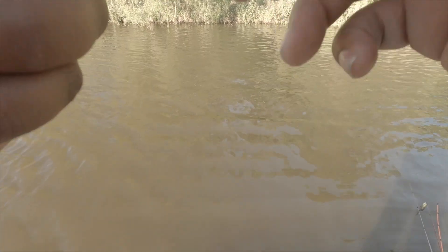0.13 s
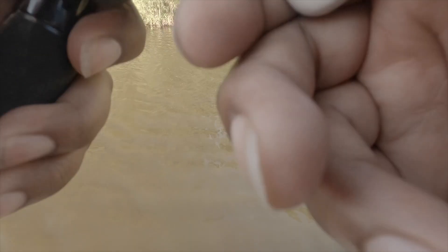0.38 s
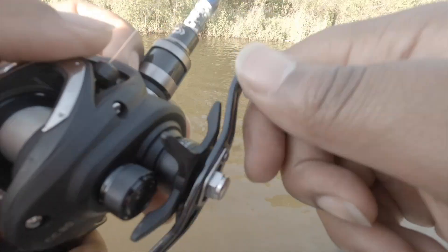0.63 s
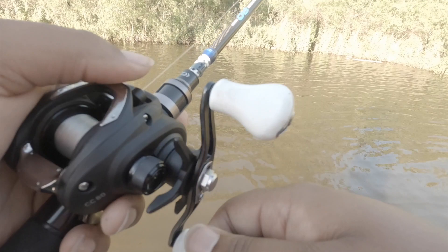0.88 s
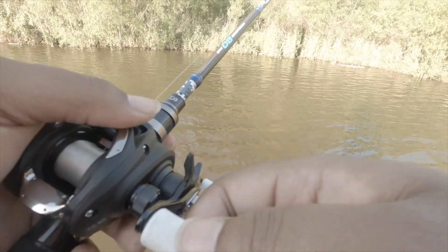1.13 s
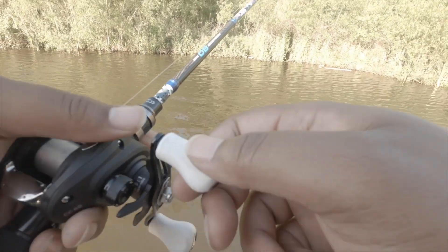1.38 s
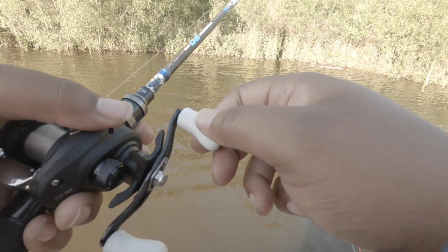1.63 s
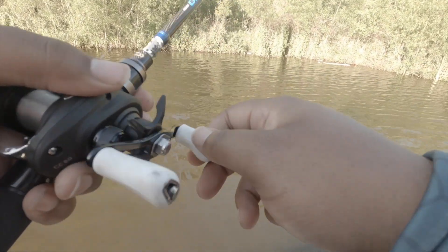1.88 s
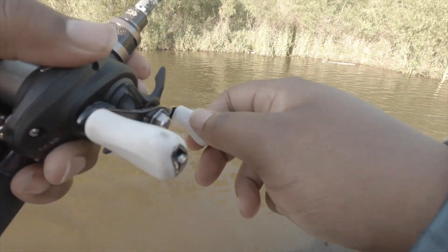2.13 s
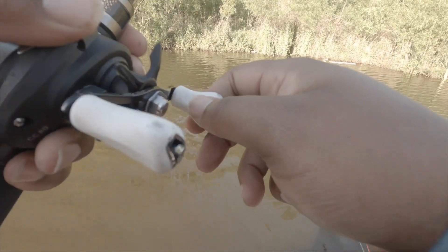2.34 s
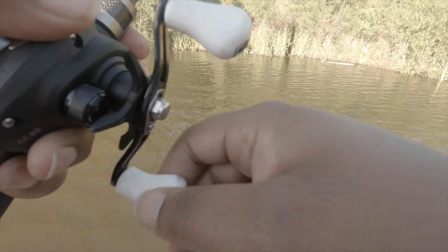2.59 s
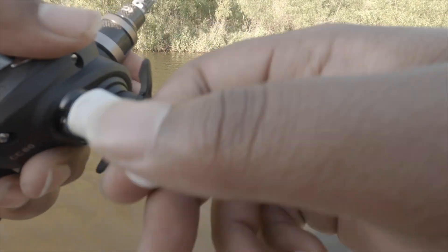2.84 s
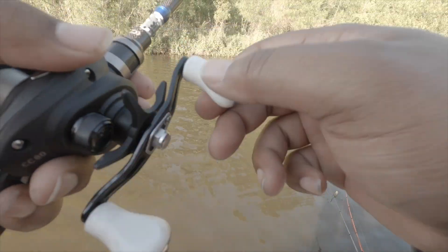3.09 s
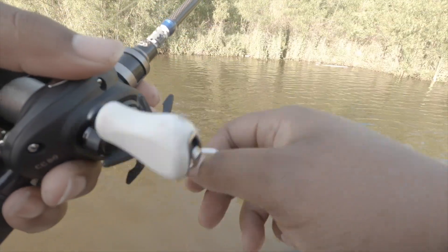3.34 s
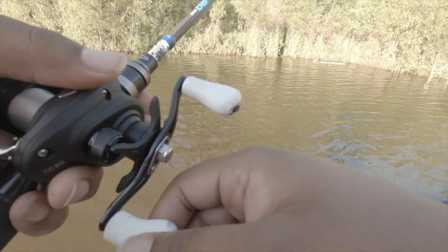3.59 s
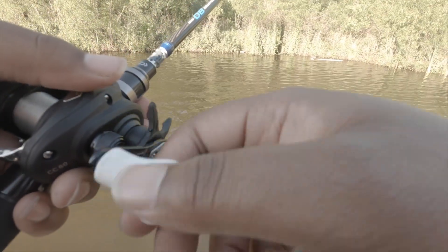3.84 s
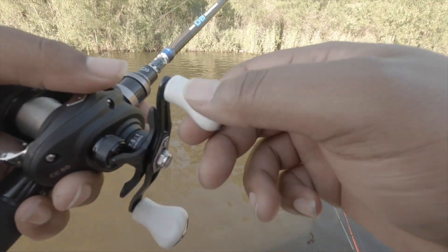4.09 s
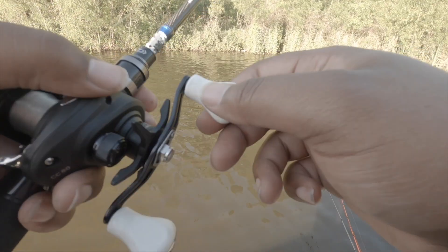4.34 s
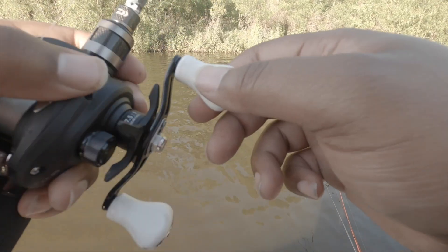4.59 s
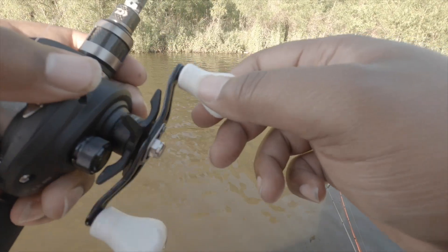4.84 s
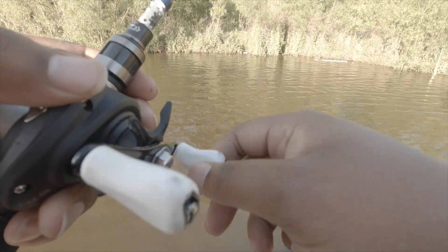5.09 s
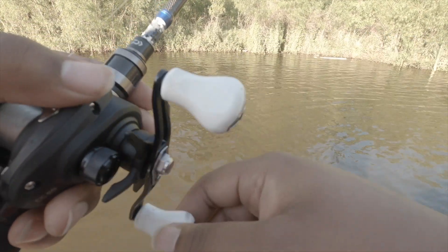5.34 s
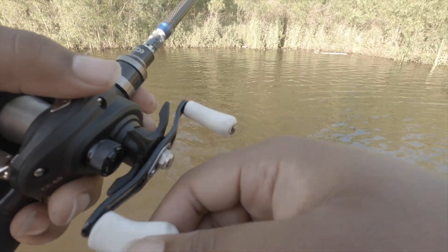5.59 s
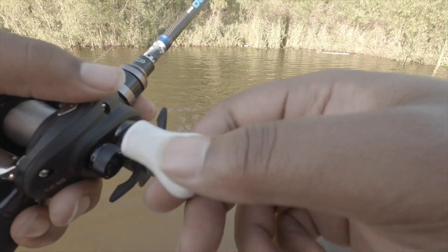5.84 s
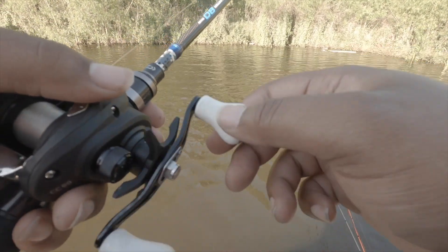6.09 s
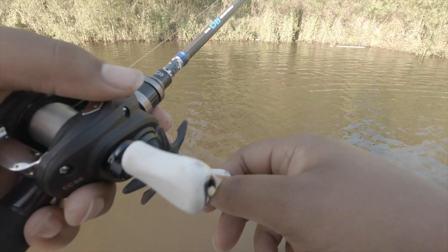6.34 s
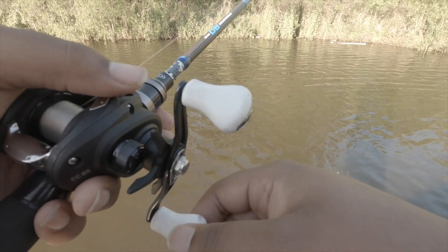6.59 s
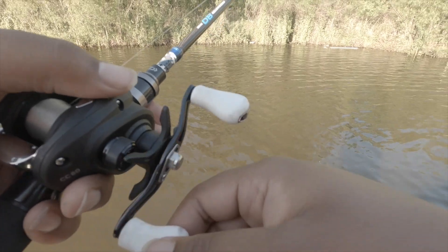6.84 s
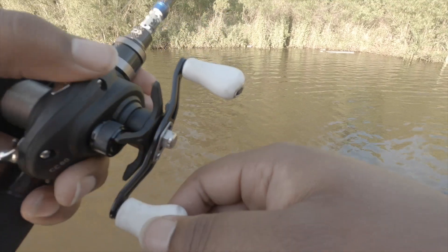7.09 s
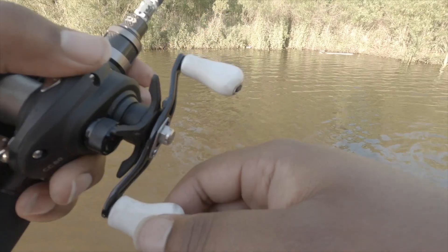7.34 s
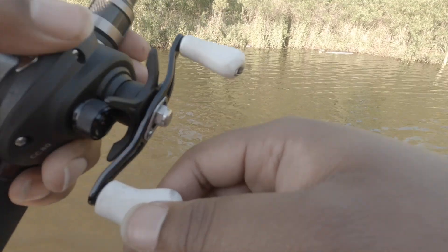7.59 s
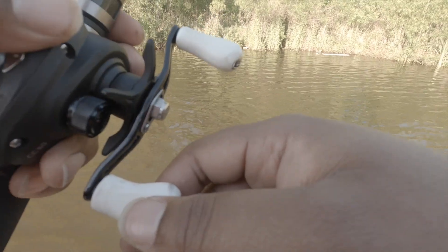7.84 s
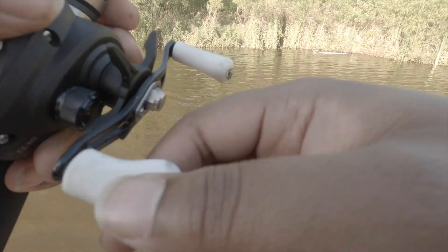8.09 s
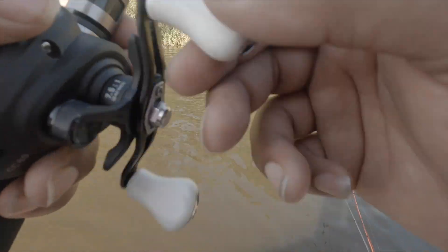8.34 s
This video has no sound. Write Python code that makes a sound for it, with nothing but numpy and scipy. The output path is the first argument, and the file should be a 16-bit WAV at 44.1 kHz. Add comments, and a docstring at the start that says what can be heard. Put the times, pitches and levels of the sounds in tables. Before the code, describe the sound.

A fishing reel snaps sharply and rattles close up, then cranks with a soft whirr as a songbird chirps across a quiet pond.

```python
"""Fishing reel at a pond

A reel is handled and cranked close to the camera: clicks and bumps are shaped noise bursts, the ringing
parts dying sines, gear whirr and the rustle of fingers and line coloured hiss. Across the water birds chirp,
whistle and tweet as fluttering sines, and tree-lined banks answer with echoes. Insects hiss over low wind
rumble and a far drone; fuzzy tones join the cranking, and for a while something scuffs nearby."""
import sys
import numpy as np
from scipy import signal
from scipy.fft import rfft, irfft
from scipy.io import wavfile
from scipy.ndimage import uniform_filter1d

SR = 44100
rng = np.random.default_rng(int(sys.argv[2]) if len(sys.argv) > 2 else 0)


def generate_wav(signal):
    """Clip the signal to [-1, 1] and save it as 16-bit WAV at the path in sys.argv[1]."""
    frames = np.transpose(np.atleast_2d(signal))
    scaled = np.clip(frames, -1, 1) * 32767
    pcm = np.round(scaled).astype(np.int16)
    wavfile.write(sys.argv[1], SR, pcm)


def linear_from_db(decibels):
    """Turn decibels (scalar or array-like) into linear amplitude factors; 0 gives 1."""
    return 10 ** (np.asarray(decibels, float) / 20)


N = 372447  # length in samples


def evened(x):
    """Scaled to rms 1."""
    return x / np.sqrt(np.mean(x ** 2) + 1e-20)


def read(points, hz):
    """A spectrum table read on a log-frequency axis."""
    f, value = np.transpose(points)
    return np.interp(np.log(hz + 1), np.log(f + 1), value)


def add(mix, s, sound):
    """Mixes a sound in at second s, cut off at the end of the mix."""
    part = mix[round(s * SR):][:len(sound)]
    part += sound[:len(part)]


def swells(events):
    """Gain over time of bell-shaped swells (middle s, half length s, dB), added in power."""
    t = np.arange(N) / SR
    return np.sqrt(sum((linear_from_db(db) * np.exp(-((t - s) / half) ** 2)) ** 2 for s, half, db in events))


def hiss(colour_db, size, patchy_db, flicker_db, same, lag=1.3):
    """Stereo noise of rms 1 from random short-time spectra; the left port hears it lag samples late.

    colour_db(hz) gives the colour, same the likeness of the ports (0 to 1)."""
    # how far the left port is louder than the right: f/Hz, level/dB
    port_lean = [(60, 0), (240, 0.5), (950, 3.5), (3770, 3.5), (15000, -1)]
    frames = 4 * N // size + 5
    hz = np.fft.rfftfreq(size, 1 / SR)
    a, b, c, d, patches = rng.standard_normal((frames, len(hz), 5)).T
    patches = uniform_filter1d(patches, size=8, axis=0)  # over frequency
    patches = evened(uniform_filter1d(patches, size=10, axis=1))  # over time
    flicker = evened(uniform_filter1d(rng.standard_normal(frames), size=3))
    same = np.clip(same * np.ones(len(hz)), 0, 1)[:, None]
    left = a + 1j * b
    right = same * left + np.sqrt(1 - same ** 2) * (c + 1j * d)
    earlier = np.exp(2j * np.pi * hz * lag / SR)
    right = right * (earlier / linear_from_db(read(port_lean, hz)))[:, None]
    level_db = colour_db(hz)[:, None] + patchy_db * patches + flicker_db * flicker
    spectra = np.array([left, right]) * linear_from_db(level_db)
    return evened(signal.istft(spectra, nperseg=size, noverlap=3 * size // 4)[1][:, :N])


def fuzzy_tone(hz, width):
    """A tone whose size and phase wander: low-passed complex noise shifted up to hz."""
    a, b = rng.standard_normal((N, 2)).T
    slow = signal.sosfilt(signal.butter(2, width / 2, fs=SR, output="sos"), a + 1j * b)
    return evened((slow * np.exp(2j * np.pi * hz * np.arange(N) / SR)).real)


def note(rows, flutter_db):
    """Start time and near sine along rows of (s, Hz, rms dB); moving air on the way makes it flutter."""
    s, hz, db = np.transpose(rows)
    t = np.arange(s[0], s[-1], 1 / SR)
    a, b = rng.standard_normal((len(t), 2)).T
    waver = 1 + 0.0021 * evened(uniform_filter1d(a, size=200))
    flutter = flutter_db * evened(uniform_filter1d(uniform_filter1d(b, size=300), size=300))
    tone = np.sin(2 * np.pi * np.cumsum(np.interp(t, s, hz) * waver) / SR)
    gain = np.sqrt(2) * linear_from_db(np.interp(t, s, db) + flutter)
    return s[0], gain * tone * signal.windows.tukey(len(t), .2)


def ringing(modes, direct):
    """Frequency response of a body: a direct share plus its resonant modes (Hz, width Hz, dB)."""
    return lambda hz: direct + sum(linear_from_db(db) / (1 + 2j * (hz - f) / w) for f, w, db in modes)


def causal_colour(edges_hz, low_db, treble_db, hz):
    """Minimum-phase response from the energy in three bands, so nothing sounds ahead of the contact."""
    per_hz = np.array([low_db, 0, treble_db]) - 10 * np.log10(np.diff(edges_hz))
    centres = np.sqrt(np.multiply(edges_hz[1:], edges_hz[:-1]))
    top, top_db = edges_hz[-1], per_hz[2]
    colour = [(edges_hz[0] / 3, per_hz[0] - 20), *zip(centres, per_hz),
              (top, top_db - 12), (top * 2.4, top_db - 40), (SR / 2, top_db - 90)]
    log_gain = np.log(linear_from_db(read(colour, hz)))
    phase = -signal.hilbert(np.r_[log_gain, log_gain[-2:0:-1]]).imag[:len(hz)]
    return np.exp(log_gain + 1j * phase)


def bursts(events, edges_hz, rise_s, grain_db, tap, body):
    """Dying bursts of grainy noise, coloured by their low and treble shares and by the body they excite."""
    out = np.zeros(N)
    t = np.arange(16384) / SR
    hz = np.fft.rfftfreq(len(t), 1 / SR)
    end_fade = np.clip((t[-1] - t) * 20 - 1, 0, 1)
    for s, peak_db, low_db, treble_db, t60 in events:
        noise = rng.standard_normal(len(t))
        unevenness = evened(uniform_filter1d(rng.standard_normal(len(t)), size=40))
        burst = noise * linear_from_db(grain_db * unevenness) * np.minimum(t / rise_s, 1) * linear_from_db(-60 * t / t60)
        burst[0] += tap  # the first contact is one firm tap
        response = causal_colour(edges_hz, low_db, treble_db, hz) * body(hz)
        sound = irfft(rfft(burst) * response) * end_fade
        add(out, s, linear_from_db(peak_db) * sound / abs(sound).max())
    return out


def ports(x, lean_db, lag):
    """A source reaches the left microphone port lag samples late and lean_db louder than the right."""
    late = np.interp(np.arange(N) - lag, np.arange(N), x)
    return np.array([late * linear_from_db(lean_db / 2), x * linear_from_db(-lean_db / 2)])


def wind():
    """Gain of the rumble: slow chance around its usual level, plus stronger puffs added in power."""
    # stronger puffs: middle t/s, half length/s, level/dB
    puffs = [(0, 0.092, -37.5), (.33, 0.064, -35), (5.27, 0.0695, -30.5), (6.42, 0.082, -36),
             (7.43, 0.113, -34), (7.88, 0.078, -36), (8.28, 0.039, -40.5)]
    usual_db, wander_db, fastest_hz = -39, 1.2, 5
    t = np.arange(0, N, 64) / SR
    chance = evened(sum(np.sin(2 * np.pi * (fastest_hz * k * t + rng.random())) / np.sqrt(k)
                        for k in np.geomspace(1 / 8, 1, num=24)))
    wander = wander_db * np.interp(np.arange(N) / SR, t, chance)
    return np.hypot(linear_from_db(usual_db + wander), swells(puffs))


def pond_air():
    """A steady wash of noise whose part below about 160 Hz is a rumble that follows the wind."""
    # colour of the quiet pond: f/Hz, relative density level/dB per Hz
    air_colour = [(12, -32.5), (20, -1.5), (91, -2.5), (130, -10.5), (222, -21), (357, -33.5), (446, -33),
                  (780, -43.5), (2910, -70), (4180, -43.5), (5680, -70), (7110, -70), (16000, -99)]
    # likeness of the two microphone ports: f/Hz, likeness (0 to 1)
    port_likeness = [(25, .55), (60, 0.84), (130, 0.96), (290, 0.9), (640, 0.78), (1410, 0.45),
                     (3100, 0.23), (6820, 0.16), (15000, 0.27)]
    same = read(port_likeness, np.fft.rfftfreq(2048, 1 / SR))
    air = linear_from_db(-33.5) * hiss(lambda f: read(air_colour, f), size=2048, patchy_db=0.8667,
                            flicker_db=1.0345, same=same)
    rumble = signal.sosfiltfilt(signal.butter(2, 160, fs=SR, output="sos"), air)
    return air - rumble + wind() * evened(rumble)


def insects():
    """Distant choruses: noise in bell-shaped bands."""
    # centre f/Hz, width/Hz, rms level/dB
    choruses = [(4070, 650, -63.5), (7040, 740, -81.5)]
    out = np.zeros((2, N))
    for centre_hz, width, db in choruses:
        out += linear_from_db(db) * hiss(lambda f: -6 * (2 * (f - centre_hz) / width) ** 2, size=512,
                              patchy_db=1.5, flicker_db=0.33, same=.35)
    return out


def far_drone():
    """A far, steady hum of a few narrow wandering tones."""
    # f/Hz, width/Hz, rms level/dB
    hum = [(79.64, 9, -45), (164.47, 6.9, -56.5), (242.16, 14, -59)]
    return sum(linear_from_db(db) * fuzzy_tone(hz, width) for hz, width, db in hum)


def gear_whirr():
    """Meshing gears, heard as coloured noise whose level follows the crank."""
    # whirr over time: t/s, rms level/dB
    crank_level = [(0, -53.5), (.52, -49.5), (.89, -53.5), (1.25, -54), (1.76, -55.5), (2.02, -61),
                   (2.4, -61.5), (2.59, -57.5), (3.1, -60.5), (4.8, -58.5), (5.06, -55), (5.65, -57),
                   (5.81, -54.5), (6.63, -53.5), (6.9, -58.5), (7.62, -64.5), (8.09, -60.5), (8.45, -54.5)]
    # whirr colour: f/Hz, relative density level/dB per Hz
    gear_colour = [(180, -34), (300, 0), (469, -9.5), (1320, -10), (2340, -24.5), (3950, -19), (4900, -26),
                   (8540, -37), (12000, -82.5), (15600, -90), (22000, -120)]
    s, db = np.transpose(crank_level)
    whirr = hiss(lambda f: read(gear_colour, f), size=512, patchy_db=3.0, flicker_db=1.0, same=.6)
    return linear_from_db(np.interp(np.arange(N) / SR, s, db)) * whirr


def chirps():
    """A songbird across the water: a held note that slides down, then a short rising curl."""
    # one chirp: t/s after its start, f/Hz, relative level/dB
    chirp_shape = [(0, 2850, -20), (.014, 2795, -8), (.038, 2705, -1), (.08, 2680, 1), (.096, 2600, 0),
                   (.122, 2310, -6), (.138, 2190, -6), (.152, 2160, -7), (.166, 2210, -12)]
    # each chirp: t/s, level/dB added to the shape, lead-in left out/s
    chirp_times = [(.0, -66.5, 0.017), (1.482, -60, 0.022), (1.764, -62, 0.0009), (2.047, -57, 0.00091),
                   (3.371, -57, 0.0232), (3.659, -57, 0.00101), (3.939, -55, 0.00078), (6.269, -62, 0.022),
                   (6.545, -58, 0.000936), (6.831, -58, .001)]
    curl_late_s, curl_s, curl_db = .175, .04, -9
    out = np.zeros(N)
    for s, db, skip in chirp_times:
        start, sound = note(np.array(chirp_shape) + [s, 0, db], flutter_db=3)
        add(out, start, sound * np.clip((np.arange(len(sound)) / SR - skip) / 0.014, 0, 1))
        s += curl_late_s
        curl = [(s, 2260, db + curl_db), (s + curl_s, 2480, db + curl_db)]
        add(out, *note(curl, flutter_db=4))
    return out


def banks(x, t60, wet_db):
    """Tree-lined banks return smeared echoes and a tail of scattered single reflections from the trunks."""
    # late/s, spread/s, level/dB of each smeared echo
    bank_echoes = [(.125, 0.009, -11), (.21, .04, -15), (.31, .05, -19)]
    t = np.arange(SR) / SR
    per_s = 1800  # reflections
    taps = rng.standard_normal((2, SR)) * (rng.random((2, SR)) < per_s / SR)
    shapes = [(wet_db, linear_from_db(-60 * t / t60) * np.minimum(t / 0.088, 1) ** 2)]
    shapes += [(db, np.exp(-((t - late) / spread) ** 2)) for late, spread, db in bank_echoes]
    wet = sum(linear_from_db(db) * shape / np.sqrt(per_s / SR * np.sum(shape ** 2)) for db, shape in shapes)
    band = signal.butter(2, [2500, 4200], "bandpass", fs=SR, output="sos")
    dull = signal.sosfilt(band, x)  # leaves return a limited band
    return signal.fftconvolve(dull[None], taps * wet, axes=1)[:, :N]


def clicks():
    """The reel close by: snaps and clicks are noise bursts that ring its frame."""
    # t/s, peak level/dB ahead of the ports, low and treble shares/dB over the middle ahead of
    # the ringing, decay t60/s of the burst
    click_events = [(.058, -40.5, 10, -19.5, 0.125), (.0917, -43, -3, -34, 0.015),
                    (.195, -40, 19, -29.5, 0.037), (.2189, -37.5, -1, -12, 0.0075),
                    (.2927, -32.5, 4.5, 6, 0.0042), (.3044, -35.5, 8, -8, 0.0092),
                    (.3381, -26.5, 1.5, -7, 0.018), (.3742, -23.5, -5, -9.5, 0.0224),
                    (.3786, -8.5, -23.5, -7.5, 0.019), (.3821, -1.5, -6, 6.5, 0.0073),
                    (.3843, -13, -6, 5, 0.0074), (.4274, -20.5, -5.5, -9, 0.0096),
                    (.4594, -35, -16.5, -26, .012), (.4783, -28.5, -22, -5, 0.03),
                    (.4924, -33, -13.5, -3.5, 0.05), (.5821, -32, 16, 3, 0.013),
                    (.6144, -29, 4, -7.5, 0.01), (.6784, -31.5, 12, -10, 0.0084),
                    (.7135, -27.5, -27, 7.5, 0.025), (.8245, -32, 3, -6, 0.0109),
                    (.9765, -32.5, -9.5, -19.5, 0.022), (1.0849, -36.5, -2, -12.5, .0098),
                    (1.2494, -46, 1.5, 6, .008), (1.6536, -41.5, -4, -18.5, .01),
                    (3.6594, -49.5, -2.5, -10, .008), (4.205, -54, -6.5, -8.5, 0.0076),
                    (4.3026, -48.5, -14, 4.5, 0.0076), (5.0953, -37.5, 5, -9, 0.0214),
                    (6.2024, -46, 1.5, -6.5, 0.0073), (6.2387, -38.5, 0.5, -1, 0.0123),
                    (6.4134, -41, 11.5, -4, 0.0096), (6.5444, -41, 20, -12, 0.0056),
                    (6.5844, -48.5, 3.5, 7.5, .0049), (6.8369, -39.5, -5.5, -16.5, 0.0059),
                    (8.3894, -42.5, -10.5, -4.5, 0.0093)]
    # what the frame rings with: f/Hz, width/Hz, level/dB
    frame_modes = [(1630, 200, -11.5), (2657, 169.57, -3), (4440, 200, -6), (5040, 500, -2.5),
                   (7100, 900, 0.5), (8480, 600, -10.5), (9880, 500, -17.5), (12500, 1500, -9)]
    return bursts(click_events, [300, 1500, 5000, 14000], rise_s=0.00011, grain_db=5.5, tap=4.5,
                  body=ringing(frame_modes, .3))


def bumps():
    """Knocks through the camera mount: low, soft-edged bursts without a ringing body."""
    # t/s, peak level/dB ahead of the ports, low and upper shares/dB over the middle, decay t60/s
    bump_events = [(.059, -35.5, 2.5, 7, 0.094), (.193, -31.5, 10, 6, 0.174), (.38, -30.5, 3, 6, 0.067),
                   (.428, -28, 12.5, 11.5, 0.133), (1.007, -28.5, -5, -7.5, 0.112),
                   (1.379, -32, 14, -2, 0.117), (5.189, -26, 6, -8.5, .13), (5.228, -23, 19.5, 3.5, .25),
                   (5.339, -27, 0, -7, 0.22), (5.472, -26.5, 16, 11.5, 0.401),
                   (6.391, -21.5, -21, -5.5, 0.25), (6.446, -23.5, 4.5, -8, 0.128)]
    return bursts(bump_events, [30, 100, 220, 450], rise_s=0.0055, grain_db=-0.11, tap=4.492,
                  body=np.ones_like)


def rustle():
    """Fingers and line slide over the spool: grains of patchy noise swell with each stroke."""
    # middle t/s, half length/s, level/dB
    strokes = [(.06, 0.021, -66), (.35, 0.056, -67), (.49, 0.0186, -42.5), (.54, 0.057, -53),
               (.61, 0.0486, -44.5), (.68, 0.052, -62), (.716, 0.0088, -38.5), (.76, 0.0405, -53.5),
               (.875, 0.0313, -58), (.97, 0.076, -63), (1.12, .06, -57.5), (1.35, 0.126, -75)]
    # colour of skin and line: f/Hz, relative density level/dB per Hz
    skin_colour = [(400, -29.5), (1000, -8), (2500, -6), (4600, -0.5), (7200, -4.5), (9000, -14),
                   (12500, -24), (15500, -23.5), (16500, -59)]
    grains = hiss(lambda f: read(skin_colour, f), size=256, patchy_db=2.5, flicker_db=1.0,
                  same=0.85, lag=0.89)
    return swells(strokes) * grains


def pings():
    """Short pitched pings, as of loose parts let go: dying sines that start softly."""
    # t/s, level/dB ahead of rise and decay, f/Hz, decay t60/s
    ping_events = [(0.3798, -20, 2666, 0.0233), (0.427, -22.5, 2712, 0.0135), (0.4277, -29.5, 4367, 0.011),
                   (0.478, -20.5, 2722, 0.0161), (0.4778, -22.5, 4405, 0.0163), (.487, -34.5, 4240, 0.031),
                   (0.4926, -28, 4454, 0.025), (.493, -33, 1656, 0.02), (.5, -33.5, 2733, 0.045),
                   (.535, -46, 2775, .06), (0.8246, -30.5, 3187, 0.0111), (.827, -34, 1717, 0.0183),
                   (5.0606, -31, 1566, 0.0285), (5.062, -39.5, 1887, 0.0254), (5.062, -43, 1018, 0.115),
                   (5.0955, -41.5, 2314, 0.0277)]
    rise_s = .0012
    out = np.zeros(N)
    t = np.arange(8192) / SR
    for s, db, hz, t60 in ping_events:
        envelope = linear_from_db(db - 60 * t / t60) * (1 - np.exp(-t / rise_s))
        add(out, s, envelope * np.sin(2 * np.pi * hz * t))
    return out


def tweets():
    """Short slurred notes of other birds, each gliding from one pitch to another."""
    # t/s, length/s, start f/Hz, end f/Hz, level/dB
    slurs = [(0.986, 0.091, 2832, 3120, -67.5), (1.672, .016, 4880, 5635, -74),
             (1.782, .018, 5750, 5030, -76), (1.81, .02, 6400, 5890, -74.5),
             (3.03, 0.071, 6000, 4910, -81.5), (3.739, .075, 2852, 3331, -68.5),
             (5.021, 0.0256, 3000, 3290, -70), (5.167, 0.0233, 2995, 3350, -71.5),
             (5.315, 0.0257, 3000, 3412, -69.5), (5.603, .025, 2992, 3327, -73.5),
             (6.738, .024, 6050, 6600, -74.5), (6.754, .028, 6590, 5560, -74.5),
             (6.778, 0.0134, 5510, 5580, -77.5), (6.799, 0.029, 5800, 5420, -77),
             (6.992, 0.0142, 6700, 5950, -77.5), (7.008, 0.055, 5915, 5980, -76.5)]
    out = np.zeros(N)
    for s, length, start_hz, end_hz, db in slurs:
        add(out, *note([(s, start_hz, db), (s + length, end_hz, db)], flutter_db=4.5))
    return out


def whines():
    """Fuzzy tones while cranking, faded in and out."""
    # from t/s, to t/s, f/Hz, width/Hz, level/dB ahead of the fades
    whine_spans = [(1.388, 1.751, 1332, 61, -62), (5.95, 6.998, 622.5, 23.88, -62)]
    out = np.zeros(N)
    for s, end, hz, width, db in whine_spans:
        count = round((end - s) * SR)
        add(out, s, linear_from_db(db) * fuzzy_tone(hz, width)[-count:] * signal.windows.tukey(count, .5))
    return out


def whistles():
    """The farther bird's held notes: each swells, then fades away, its pitch drooping a little."""
    # t/s, length/s, f/Hz and level/dB at the height of the swell, share of the length spent swelling
    held_notes = [(1.779, 0.37, 5860, -70.5, 0.297), (1.941, 0.31, 4549, -62, .45),
                  (2.2, 0.54, 6905, -76, 0.606), (2.515, 0.1885, 4036, -62.5, 0.557),
                  (7.709, 0.476, 5860, -69, 0.3), (8.023, 0.2905, 4555, -58.5, 0.546),
                  (8.27, 0.177, 6830, -69, 0.93)]
    start_db, end_db, sag = -6, -19, 0.00821  # levels from the height, pitch share
    out = np.zeros(N)
    for s, length, hz, db, swell in held_notes:
        rows = [(s, hz * (1 + sag), db + start_db), (s + swell * length, hz, db),
                (s + length, hz * (1 - sag), db + end_db)]
        add(out, *note(rows, flutter_db=3.2))
    return out


def scuffs():
    """Something hollow is scuffed nearby: softer, longer noise bursts that ring it."""
    # t/s, peak level/dB ahead of the ports, low and treble shares/dB over the middle ahead of
    # the ringing, decay t60/s of the burst
    scuff_events = [(4.841, -35.5, -6, -29.5, 0.0435), (4.902, -32, 5.5, 0, 0.135),
                    (5.058, -33.5, -1.5, -14, 0.0665), (5.218, -32, 9, -10, 0.124),
                    (5.287, -35, 19, -22.5, 0.06), (5.338, -35.5, 5.5, -6.5, 0.0344),
                    (5.421, -35.5, 8, -12, 0.29), (5.468, -30, -6.5, -5, 0.092),
                    (5.489, -32.5, -4, -15, 0.096), (5.526, -28.5, 1.5, -7, 0.202),
                    (5.549, -35.5, 9, -16, 0.18), (5.807, -31.5, 4.5, -8.5, 0.268),
                    (5.981, -27, -1, 0.5, 0.087), (5.999, -28.5, 2, -12.5, 0.136),
                    (6.11, -33.5, -1.5, -12, 0.182), (6.25, -31.5, -4.5, -31.5, 0.052),
                    (6.379, -34, 3, -20.5, 0.2), (6.399, -22, 3.5, -26, 0.141), (6.5, -32.5, 8, -9, 0.286),
                    (6.711, -35.5, 12.5, -19, 0.262)]
    # what the scuffed thing rings with: f/Hz, width/Hz, level/dB
    hollow_modes = [(309.8, 28.8, 10), (655.2, 5.1, 9), (738.5, 12, 9.5), (1109, 210, 3.5), (1642, 85, 2),
                    (2586, 150, 5.5)]
    return bursts(scuff_events, [150, 700, 3000, 9000], rise_s=0.002, grain_db=3.0, tap=3,
                  body=ringing(hollow_modes, 1.18))


def scene():
    """Handling close to the microphone, birds across the water with their echoes, and the pond air."""
    background = pond_air() + insects()
    tones = ports(far_drone() + whines(), 1.2, lag=1.1)
    song = chirps() + tweets() + whistles()
    birds = ports(song, 5.8, lag=1.0) + banks(song, t60=0.974, wet_db=-0.73)
    reel = ports(clicks() + pings(), 3.2, lag=0.51) + gear_whirr() + rustle()
    knocks = ports(scuffs() + bumps(), -.6, lag=2.2)
    return background + tones + birds + reel + knocks


def band_limit(x):
    """A steep low-pass at the top of the band."""
    return signal.sosfilt(signal.butter(12, 16520, fs=SR, output="sos"), x)


def record(dry):
    """The camera's band limit at 16.3 kHz, with a soft start and end."""
    limited = signal.oaconvolve(dry, signal.firwin(255, 16300, fs=SR)[None], "same")
    mix = limited * signal.windows.tukey(N, .001)
    return band_limit(mix)


dry = scene()
out = record(dry)
generate_wav(out)
```